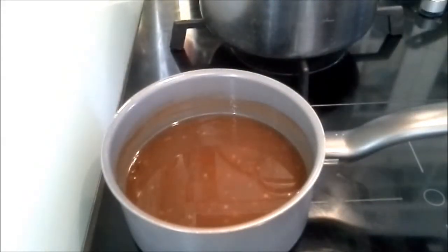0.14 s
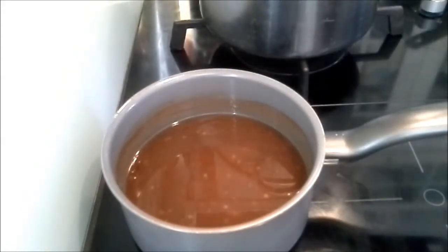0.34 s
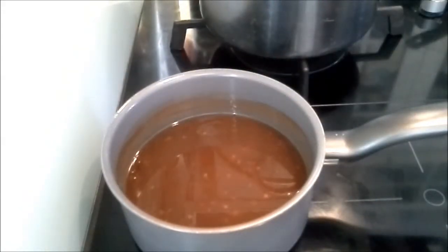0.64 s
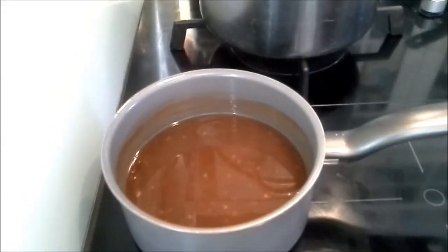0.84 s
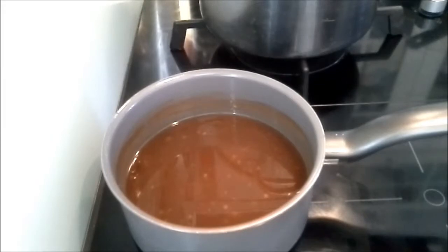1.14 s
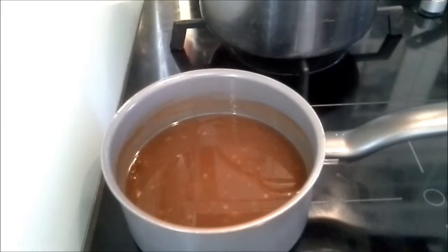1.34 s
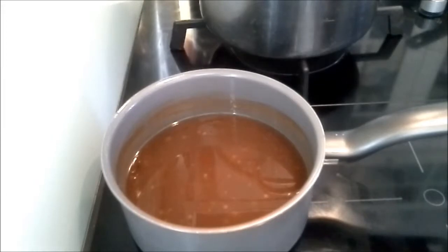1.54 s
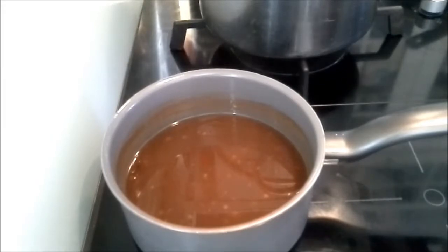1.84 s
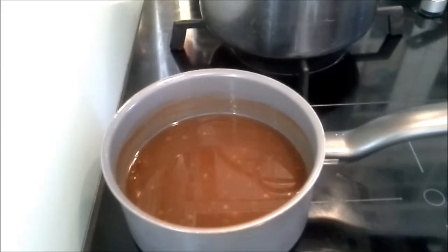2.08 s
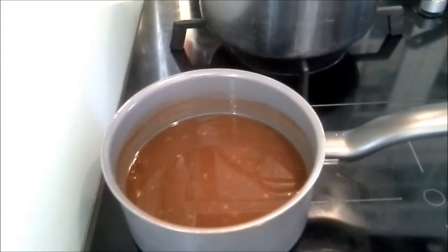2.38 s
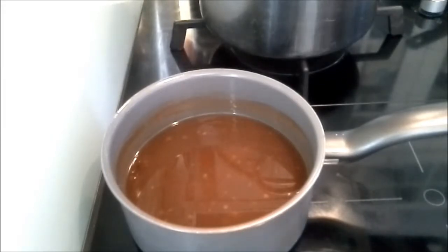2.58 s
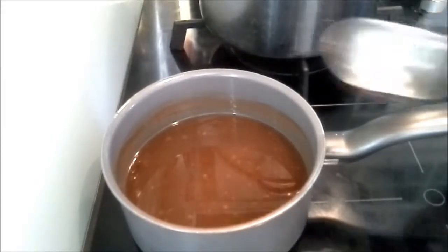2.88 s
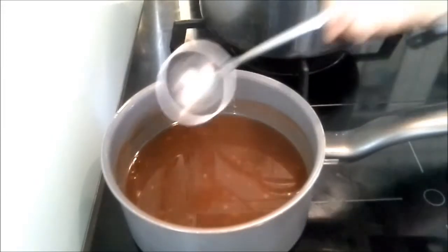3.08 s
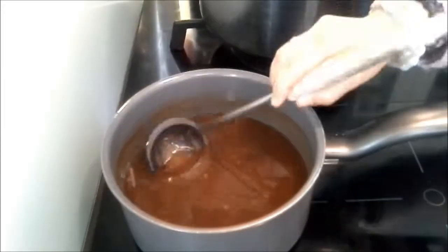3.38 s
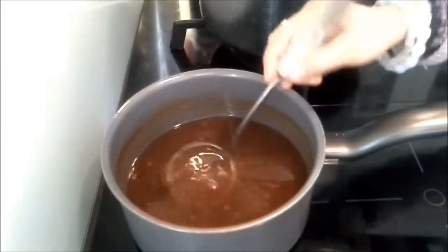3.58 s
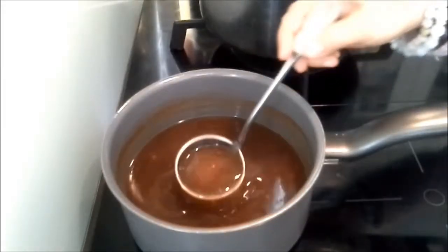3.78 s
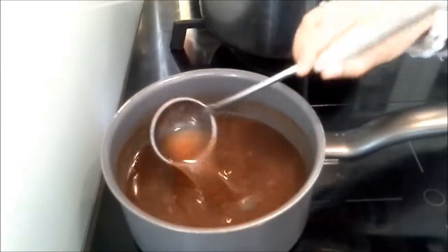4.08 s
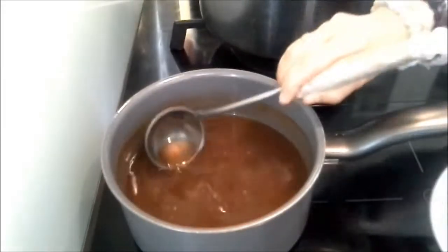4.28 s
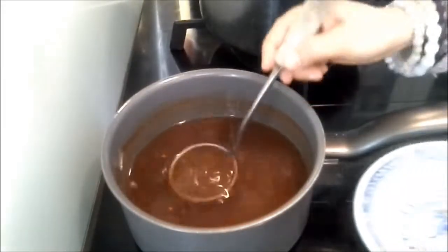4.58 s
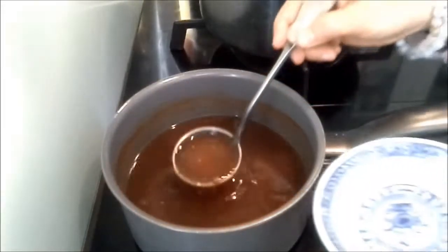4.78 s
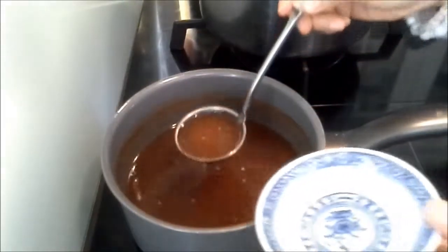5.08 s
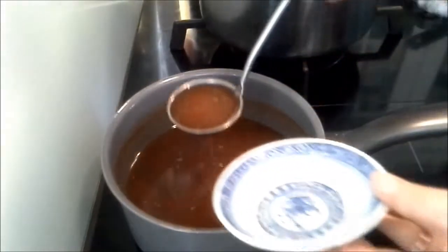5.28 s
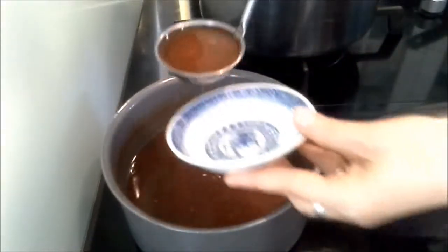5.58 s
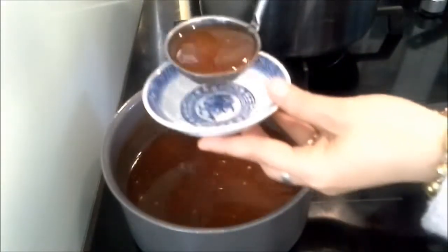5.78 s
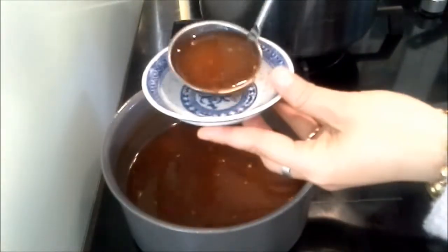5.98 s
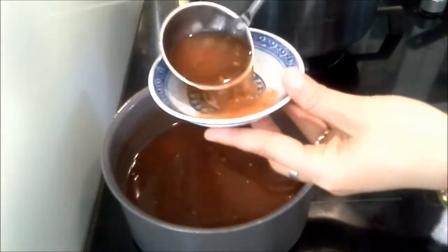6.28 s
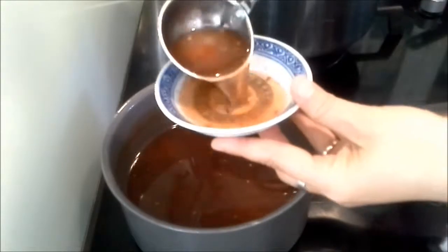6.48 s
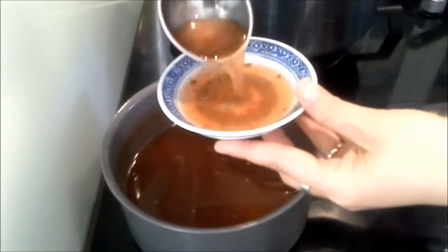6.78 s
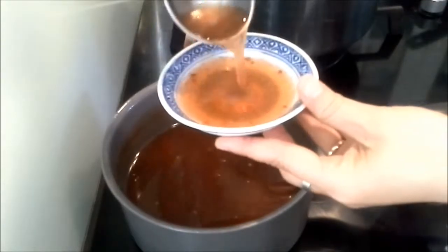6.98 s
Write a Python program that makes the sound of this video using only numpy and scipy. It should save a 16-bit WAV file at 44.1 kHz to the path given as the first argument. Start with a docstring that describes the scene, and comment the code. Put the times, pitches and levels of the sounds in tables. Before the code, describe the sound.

A quiet small tiled kitchen, heard close, with low building rumble, soft room hush and faint thin high tones. Tiny dry bracelet-bead ticks appear in the first 0.45 seconds. From about 0.57 to 1.2 a porcelain dish is bumped, rocks and slides, giving short damped clinks and grainy rubbing; faint touches follow until 1.6. At 1.69 a steel ladle takes a sharp, very loud blow, bright and noisy, then rattles in quick irregular clanks and drags until about 2.05. Crisp bead ticks cluster at 2.1-2.35 and 2.6-2.95, with weaker ones after. At 3.5 the ladle bumps the saucepan with a strong, hollow, quickly damped knock; a softer, brighter-edged one comes at 4.5. The hush sinks, with barely audible ticks. At 6.0 the full ladle makes a small dry clack on the dish, without ringing, and the hush fades towards 7 seconds.

```python
"""A steel ladle takes a hard blow, rattles and drags in a small tiled kitchen: steel modes over noisy cracks.
A porcelain dish is bumped and slides (short ring, grainy rubbing); bracelet beads tick (dry noise bursts).
The ladle bumps the pan twice (damped hollow modes); the full ladle clacks on the dish with no ring.
Thin sines swell and die over a low rumble. Room hush and microphone hiss, both shaped noise in one layer,
sink between the last contacts."""
import sys
import numpy as np
from scipy import signal
from scipy.fft import rfft, irfft, next_fast_len
from scipy.io import wavfile
from scipy.ndimage import uniform_filter1d, map_coordinates

SR = 44100
rng = np.random.default_rng(int(sys.argv[2]) if len(sys.argv) > 2 else 0)


def bounce(signal):
    """Save signal as a 16-bit WAV file at the path given by the first command-line argument."""
    frames = np.transpose(np.atleast_2d(signal))
    limited = np.clip(frames, -1, 1)
    pcm = np.round(limited * 32767).astype(np.int16)
    wavfile.write(sys.argv[1], SR, pcm)


N = 314433
EVENT_SAMPLES = 2 ** 14  # length of one contact and of one room tail


def amp(db):
    """Gain of a level in dB."""
    return 10 ** (np.asarray(db) / 20)


def unit(x):
    """Scale to rms 1."""
    return x / np.sqrt(np.mean(x ** 2) + 1e-20)


def along(points, hz):
    """Interpolate (frequency [Hz], value) points on a log-frequency axis."""
    point_hz, value = np.transpose(points)
    return np.interp(np.log(hz + 1), np.log(point_hz + 1), value)


def filtered(x, response):
    """Multiply the spectrum of x by a response of frequency, padded against wrap-around."""
    size = next_fast_len(x.shape[-1] + SR // 2)
    spectrum = rfft(x, size) * response(np.fft.rfftfreq(size, 1 / SR))
    return irfft(spectrum, size)[..., :x.shape[-1]]


def causal(db):
    """Minimum-phase response with these gains, floored at -90 dB: it starts at the blow (folded cepstrum)."""
    cepstrum = irfft(np.log(amp(np.maximum(db, -90))))
    half = len(cepstrum) // 2
    cepstrum[1:half] *= 2
    cepstrum[half + 1:] = 0
    return np.exp(rfft(cepstrum))


def octaves(hz):
    """Octaves above a 2 kHz pivot, flattened at the bottom by a 100 Hz offset."""
    return np.log2((hz + 100) / 2000)


# Kitchen decay: (frequency [Hz], t60 [s])
KITCHEN_DECAY = [(150, 0.27), (1000, 0.31), (5000, .35), (14000, 0.18)]


def echo():
    """Fresh energy-1 room tail: noise whose frequencies each die at their own speed."""
    hz, t, bins = signal.stft(rng.standard_normal(EVENT_SAMPLES), SR, nperseg=256)
    decay = amp(-60 * t / along(KITCHEN_DECAY, hz)[:, None])
    tail = signal.istft(bins * decay, SR, nperseg=256)[1][:EVENT_SAMPLES]
    u = np.arange(EVENT_SAMPLES) / SR
    onset = 1 - np.exp(-u / .002)
    near_surfaces = 1 + 1.1 * np.exp(-u / .018)
    tail = tail * onset * near_surfaces
    return tail / np.linalg.norm(tail)


def struck_ring(modes, ringing, attack_s, scatter_db):
    """Decaying sines at scattered strengths; the blow's spot favours a mode, a touch damps them all."""
    t = np.arange(EVENT_SAMPLES) / SR
    ring_db, ring_tilt_db, free_s, *favoured_hz = ringing
    hz, db, t60_s = np.transpose(modes)[..., None]
    start_db = db + ring_tilt_db * octaves(hz) + scatter_db * rng.standard_normal(hz.shape)
    for spot_hz in favoured_hz:
        start_db += 9 * np.exp(-(np.log(hz / spot_hz) / .1) ** 2)
    ring = np.sum(amp(start_db - 60 * t / t60_s) * np.sin(2 * np.pi * hz * t), axis=0)
    touch_db = -60 * np.maximum(t - free_s, 0) / .03
    return ring * amp(ring_db + touch_db) * (1 - np.exp(-t / attack_s)) ** 2


def strikes(contacts, tone, modes=None, attack_s=.001, scatter_db=3, ring_echo_db=-8):
    """Each contact: a click, a coloured noisy crack, ringing modes if any, and the room's answer."""
    out = np.zeros(N + 2 * EVENT_SAMPLES)
    t = np.arange(EVENT_SAMPLES) / SR
    for s, contact_db, tilt_db, echo_db, crack_t60_s, *ringing in contacts:
        chatter = amp(-60 * t / crack_t60_s) * (1 - np.exp(-t / .0004)) * rng.standard_normal(EVENT_SAMPLES)
        pair = filtered(np.array([t == 0, chatter]), lambda hz: causal(along(tone, hz) + tilt_db * octaves(hz)))
        click, crack = 4 * pair / np.linalg.norm(pair, axis=1)[:, None]
        ring = struck_ring(modes, ringing, attack_s, scatter_db) if modes else 0 * t
        room = signal.fftconvolve(click + amp(ring_echo_db) * ring, echo())
        direct = np.pad(.32 * click + crack + ring, (0, EVENT_SAMPLES - 1))
        wet = direct + amp(echo_db) * room
        out[round(s * SR):][:len(wet)] += amp(contact_db) * wet
    return out[:N]


def stroke_gain(strokes):
    """Gain per sample: each stroke catches, glides between its levels in dB and lets go."""
    catch_db_per_s, let_go_db_per_s = 1500, 700
    t = np.arange(N) / SR
    gain = np.zeros(N)
    for start_s, end_s, first_db, last_db in strokes:
        db = np.interp(t, [start_s, end_s], [first_db, last_db])
        db -= catch_db_per_s * np.maximum(start_s - t, 0)
        db -= let_go_db_per_s * np.maximum(t - end_s, 0)
        gain += amp(db)
    return gain


def rubbing(strokes, modes, tone, grains_hz, ring_db, held_hz):
    """Rough surfaces catch in tiny uneven jolts that shake the body and its modes."""
    jolts = (rng.random(N) < grains_hz / SR) * rng.standard_normal(N) * amp(1.8 * rng.standard_normal(N))
    jolts = unit(jolts) + .5 * rng.standard_normal(N)

    def resonances(hz):
        """Resonators of alternating sign, each widened by the hand's grip."""
        total = 0
        for k, (mode_hz, db, t60_s) in enumerate(modes):
            width_hz = np.log(1000) / np.pi / t60_s + held_hz
            resonator = 1j * hz * np.sqrt(width_hz) / (mode_hz ** 2 - hz ** 2 + 1j * hz * width_hz)
            total = total + (-1) ** k * amp(db) * resonator
        return total

    gain = stroke_gain(strokes)
    body = gain * unit(filtered(jolts, lambda hz: causal(along(tone, hz))))
    ring = filtered(gain * jolts, resonances)
    return body + amp(ring_db) * ring * np.linalg.norm(body) / np.linalg.norm(ring)


# Hush level, renewed at each row: (time [s], level [dB], hold [s], sinking [dB/s])
HUSH_LEVEL = [(0, -57.5, 3.33, 4), (4.506, -58, .55, 14.5), (6.013, -58, 0.17, 16.5)]
# Hush spectrum: (frequency [Hz], relative density [dB])
HUSH_TONE = [(65, -34.5), (110, -6), (156, -2.5), (270, -4), (345, -4), (587, -8), (960, -14),
             (3000, -23.5), (3900, -21.5), (4500, -15.5), (5050, -20), (5600, -23), (14500, -23)]


def hush(patch_rms_db):
    """Shaped noise with faint time-frequency patches; its level holds, sinks and comes back at a contact."""
    bins = signal.stft(rng.standard_normal(N), nperseg=512)[2]
    field = uniform_filter1d(rng.standard_normal(bins.shape), size=6, axis=0)
    field = uniform_filter1d(field, size=12, axis=1)
    noise = signal.istft(bins * amp(patch_rms_db * unit(field)), nperseg=512)[1][:N]
    t, rows = np.arange(N) / SR, np.array(HUSH_LEVEL)
    current = np.maximum(np.searchsorted(rows[:, 0], t, "right") - 1, 0)
    s, db, hold_s, sink_db_per_s = rows[current].T
    gain = amp(db - sink_db_per_s * np.maximum(t - s - hold_s, 0))
    return gain * unit(filtered(noise, lambda hz: amp(along(HUSH_TONE, hz))))


# Building rumble spectrum: (frequency [Hz], relative density [dB])
RUMBLE_TONE = [(12, -44.5), (20, -20), (45, -9), (98, 0), (116, 2.5), (136, -14), (300, -28), (390, -52.5),
               (660, -120)]


def rumble(db, lumps_db):
    """The building's low noise, its level wandering between random points 6 times a second."""
    lumps = map_coordinates(rng.standard_normal(int(N * 6 / SR) + 4), [np.arange(N) * 6 / SR])
    noise = filtered(rng.standard_normal(N), lambda hz: amp(along(RUMBLE_TONE, hz)))
    return amp(db + lumps_db * lumps) * unit(noise)


# Thin tones: (time [s], frequency [Hz], level before the swell factor [dB], t60 [s])
SINGS = [(0, 3430, -65, .9), (.15, 4200, -61, .6), (.612, 3850, -39.5, .28), (2.148, 1366, -36, .06),
         (2.218, 4500, -26, .05), (2.917, 3800, -46, .045), (4.24, 3780, -54, .04), (4.697, 3580, -54, .04),
         (4.813, 5000, -47, .04), (4.908, 3600, -49, .045), (5.606, 2600, -55, .04)]


def singing():
    """Thin sines that swell over a share of their t60 and die."""
    swell_share = .06
    t = np.arange(N) / SR
    out = np.zeros(N)
    for s, hz, db, t60_s in SINGS:
        u = np.maximum(t - s, 0)
        swell = 1 - np.exp(-u / (swell_share * t60_s))
        out += amp(db - 60 * u / t60_s) * swell * np.sin(2 * np.pi * hz * u)
    return out


# Bead ticks: (time [s], level [dB], tilt [dB/octave])
BEAD_TICKS = [(0.0337, -43.5, -5), (0.2285, -40, 0), (0.3542, -37, 1), (0.3605, -38, -6),
              (0.4277, -32.5, -3.5), (0.4316, -23.5, 0.5), (0.864, -45, -3), (1.482, -41.5, -15),
              (2.0725, -37.5, -1), (2.1103, -30.5, -9), (2.14, -25, 2), (2.149, -23, 2.5), (2.165, -19, 6),
              (2.2026, -25.5, -8.5), (2.219, -35, -8.5), (2.3038, -40, -6), (2.312, -28, 12.5),
              (2.3418, -40.5, -3.5), (2.607, -49, 2), (2.615, -31, 4.5), (2.677, -46, 5), (2.7, -43, -0.5),
              (2.7435, -32, 2), (2.7473, -23, 2), (2.788, -18, 10), (2.7922, -25.5, 4), (2.8083, -37.5, -8),
              (2.8422, -28.5, 4), (2.9173, -40, -7), (2.9352, -38, -4), (3.1787, -34, -3.5),
              (3.183, -27, 0), (3.241, -43, -1.5), (3.3105, -38.5, -2), (3.569, -31.5, -1),
              (3.6064, -39, 9), (3.85, -48, -9), (4.4107, -51.5, -3.5), (4.813, -39, -2),
              (4.9097, -49.5, -7), (5.1416, -49, 0), (5.606, -52, -11)]
# Bead spectrum: (frequency [Hz], relative density [dB])
BEAD_TONE = [(60, -90.5), (500, -40), (1200, -26.5), (2800, -18), (3800, -6), (4500, 4), (5300, -3.5),
             (7000, -8.5), (14500, -11)]


def beads():
    """Bracelet beads tick drily on each other and the handle; louder ticks are nearer, with less echo."""
    crack_t60_s, usual_db, usual_echo_db, echo_db_lost_per_db = .014, -35, -2, .25
    contacts = []
    for s, db, tilt_db in BEAD_TICKS:
        echo_db = usual_echo_db - echo_db_lost_per_db * (db - usual_db)
        contacts.append((s, db, tilt_db, echo_db, crack_t60_s))
    return strikes(contacts, BEAD_TONE)


# Dish contacts: (time [s], level [dB], tilt [dB/octave], relative ring [dB], ring tilt [dB/octave])
DISH_CONTACTS = [(.565, -36, 4, -34, -5), (.58, -25.5, -0.5, -11.5, -1.5), (.597, -22.5, -1, -13, -2.5),
                 (.672, -40.5, -9, -11.5, -8.5), (.779, -17, -1, -22, -5), (.938, -31, 3.5, -33, -5),
                 (.978, -20, 4, -4.5, 0), (1.02, -38, -6, -11, -7), (1.039, -32.5, -11, -3.5, -4),
                 (1.058, -38, -1, -5, -8.5), (1.097, -37, 16.5, -21, -9), (1.103, -22, -1.5, -25, -5),
                 (1.131, -27.5, 0, -22, -1), (1.154, -35.5, -8, -6, -5.5), (1.191, -40, -1, -4, -3),
                 (1.207, -33, 1, -11, -4.5), (1.357, -42, -1.5, -25, -3), (1.565, -42, -7, -31, -6)]
# Porcelain modes: (frequency [Hz], relative level [dB], t60 [s])
DISH_MODES = [(431, -8, .08), (640, -9, .06), (1190, -5, .07), (1281, -1, .07), (2116, -8, .08),
              (3564, -9, .04), (4100, -16, .03), (5028, 3, .06), (5075, -8, .2), (7040, -15, .06)]
# Dish crack spectrum: (frequency [Hz], relative density [dB])
DISH_TONE = [(88, -33), (150, -37.5), (382, 1.5), (1090, 0.5), (1280, 1.5), (1630, -3), (2060, -10.5),
             (4220, -12), (4800, -10.5), (5980, -26), (12000, -48), (15600, -63), (22000, -120)]
# Dish slides: (start [s], end [s], first level [dB], last level [dB])
DISH_SLIDES = [(.58, .74, -41.5, -73), (.985, 1.235, -49.5, -56)]


def dish():
    """The porcelain dish is bumped, rocks and slides; the counter soon damps its ring."""
    echo_db, crack_t60_s, free_s = -2.5, .082, .042
    contacts = [(s, db, tilt_db, echo_db, crack_t60_s, ring_db, ring_tilt_db, free_s)
                for s, db, tilt_db, ring_db, ring_tilt_db in DISH_CONTACTS]
    bumps = strikes(contacts, DISH_TONE, DISH_MODES, attack_s=.00099, scatter_db=2)
    slides = rubbing(DISH_SLIDES, DISH_MODES[:6], DISH_TONE, grains_hz=1510, ring_db=-4.5, held_hz=25)
    return bumps + slides


# Ladle blows: (time [s], level [dB], relative ring [dB], mode favoured by the spot [Hz], free ringing [s])
LADLE_BLOWS = [(1.6906, 0, -10.5, 4570, 0.039), (1.7395, -10, -11.5, 3860, 0.019),
               (1.748, -10.5, -13, 1366, 0.016), (1.7706, -8.5, -22, 6611, .03),
               (1.7844, -11.5, -9, 1986, .012), (1.7911, -6.5, -29, 10125, 0.065),
               (1.8044, -16.5, -6.5, 2814, .02), (1.8214, -8.5, -26, 6332, .03),
               (1.8334, -14.5, -16, 4630, .04), (1.8764, -11.5, -17.5, 860, 0.022),
               (1.8829, -10, -13.5, 3860, .015), (1.896, -17.5, -22, 14205, 0.035),
               (1.9145, -15, -24.5, 11900, 0.055), (1.941, -22.5, -22, 8040, 0.077)]
# Steel modes: (frequency [Hz], relative level [dB], t60 when free [s])
LADLE_MODES = [(860, -13, .15), (1366, -3.5, .35), (1986, -13, .12), (2664, -18, .3), (2814, -15, .3),
               (3545, -15, .22), (3860, -6, .07), (4220, -6, .1), (4366, -6, .1), (4508, -11, .2),
               (4681, -6, .3), (5260, -12, .1), (6332, -13, .4), (6611, -11.5, .4), (7816, -19, .3),
               (10125, -22, .3), (11300, -27, .2), (11900, -24, .4), (13200, -23, .3), (14205, -25, .3)]
# Ladle crack spectrum: (frequency [Hz], relative density [dB])
LADLE_TONE = [(59, -82.5), (100, -48.5), (183, -26), (854, -8.5), (1010, -9), (2370, -14), (4520, 1),
              (10600, -24), (11800, -11), (12500, -22.5), (14500, -17.5)]
# Ladle drags: (start [s], end [s], first level [dB], last level [dB])
LADLE_DRAGS = [(1.70, 1.95, -27, -30.5), (1.95, 2.06, -40.5, -63), (2.11, 2.168, -51.5, -43),
               (2.2, 2.226, -45, -45.5)]
# Counter jolted by the hard blow: (time [s], pulse scale [dB], push [s])
COUNTER_THUMP = (1.691, -37.5, 0.0047)


def ladle():
    """A hard blow jolts the counter; softer blows rattle, crack shorter and lean to the mode they favour."""
    tilt_db, echo_db = -1.5, -4
    rattle_t60_s, hard_extra_t60_s, hard_db_lost_per_db = .014, .03, 3.2
    spot_tilt_db, spot_lean_db = -.2, 3  # ring tilt per octave; its rise per octave of favoured mode over 2 kHz
    contacts = []
    for s, db, ring_db, spot_hz, free_s in LADLE_BLOWS:
        hardness = np.minimum(amp(hard_db_lost_per_db * db), 1)
        crack_t60_s = rattle_t60_s + hard_extra_t60_s * hardness
        ring_tilt_db = spot_tilt_db + spot_lean_db * (1 - hardness) * np.log2(spot_hz / 2000)
        contacts.append((s, db, tilt_db, echo_db, crack_t60_s, ring_db, ring_tilt_db, free_s, spot_hz))
    blows = strikes(contacts, LADLE_TONE, LADLE_MODES, attack_s=.001, scatter_db=.5, ring_echo_db=-13.5)
    thump_s, thump_db, push_s = COUNTER_THUMP
    u = np.maximum(np.arange(N) / SR - thump_s, 0) / push_s
    thump = amp(thump_db) * u * (2 - u) * np.exp(-u)
    drags = rubbing(LADLE_DRAGS, LADLE_MODES, LADLE_TONE, grains_hz=1200, ring_db=-12.5, held_hz=70)
    return blows + thump + drags


# Pan bumps: (time [s], level [dB], tilt [dB/octave], relative ring [dB], bright band [Hz], band lift [dB])
PAN_BUMPS = [(3.5003, -10, 0.8, 2.5, 4600, 1.5), (4.4918, -17, -0.2, 6.5, 5300, 6)]
# Pan modes: (frequency [Hz], relative level [dB], t60 [s])
PAN_MODES = [(145, -26.5, 0.033), (411, -14, 0.037), (926, -7.5, 0.022), (885.3, 1, 0.047),
             (975, -8, 0.066), (1500, -7.5, 0.041), (1736, -15, 0.071), (3567, -12, .025),
             (5025, -17, 0.026)]
# Pan crack spectrum without the bright band: (frequency [Hz], relative density [dB])
PAN_TONE = [(100, -38), (250, -12), (600, -6.5), (900, -14), (1500, -1.5), (2300, -9), (3100, -13),
            (4600, -7.5), (5600, -14.5), (6200, -17), (9000, -28), (14500, -43.5)]


def pan():
    """Dull pan bumps by the ladle: a hollow ring builds over a few cycles, a bright band depends on the spot."""
    echo_db, crack_t60_s, ring_tilt_db, free_s = -3.5, .044, -1.96, .2
    hz = np.geomspace(100, 14500, 60)
    out = np.zeros(N)
    for s, db, tilt_db, ring_db, band_hz, lift_db in PAN_BUMPS:
        band = np.exp(-(np.log(hz / band_hz) / .14) ** 2)
        tone = np.c_[hz, along(PAN_TONE, hz) + lift_db * band]
        contact = (s, db, tilt_db, echo_db, crack_t60_s, ring_db, ring_tilt_db, free_s)
        out += strikes([contact], tone, PAN_MODES, attack_s=.004, scatter_db=.7, ring_echo_db=-5.5)
    return out


# Full ladle on dish: (time [s], level [dB], tilt [dB/octave], echo [dB], crack t60 [s])
CLACK_CONTACTS = [(6.0145, -23.5, -1.4, 0, 0.013)]
# Clack spectrum: (frequency [Hz], relative density [dB])
CLACK_TONE = [(150, -46), (600, -10.5), (950, -1.5), (1400, -14), (2000, -7.5), (2600, -9), (3250, -23),
              (4050, -3), (4750, -6.5), (5400, -26), (6500, -15), (9000, -21), (10000, -38), (14500, -43)]


def clack():
    """The full ladle clacks on the dish: a click and a short crack, no ringing modes."""
    return strikes(CLACK_CONTACTS, CLACK_TONE)


def scene():
    """Sum all sources; one microphone feeds both channels."""
    background = hush(patch_rms_db=.7) + rumble(db=-75, lumps_db=2.5) + singing()
    sound = background + beads() + dish() + ladle() + pan() + clack()
    return np.array([sound, sound])


def record(dry):
    """Round off peaks, roll off the treble and cut everything above the band limit."""
    headroom, roll_hz, top_hz = .6, 14450, 15994
    rounded = dry / (1 + np.abs(dry / headroom) ** 4) ** (1 / 4)
    return filtered(rounded, lambda hz: (hz < top_hz) / (1 + (hz / roll_hz) ** 80))


dry = scene()
out = record(dry)
bounce(out)
```